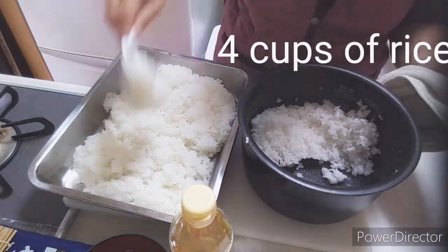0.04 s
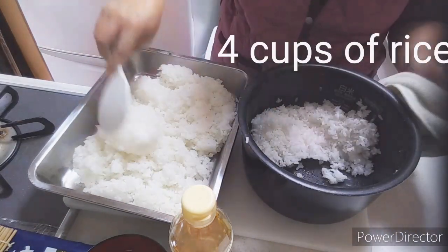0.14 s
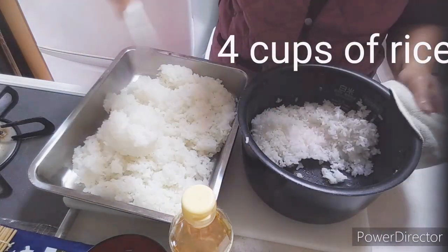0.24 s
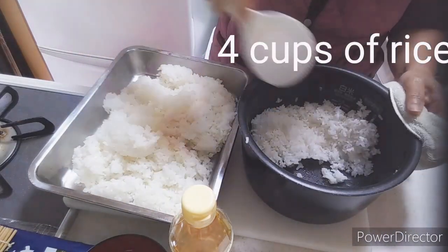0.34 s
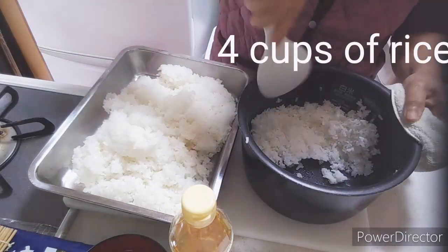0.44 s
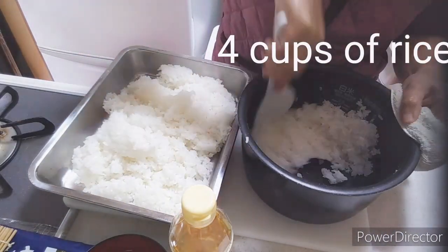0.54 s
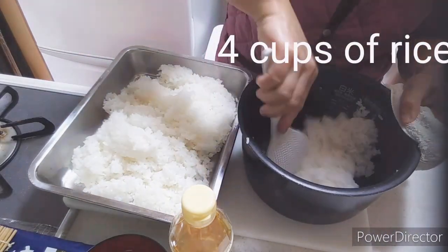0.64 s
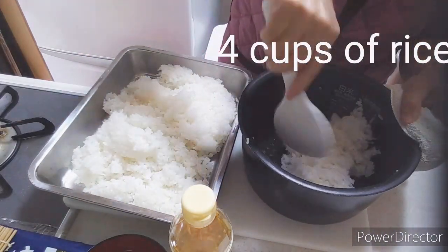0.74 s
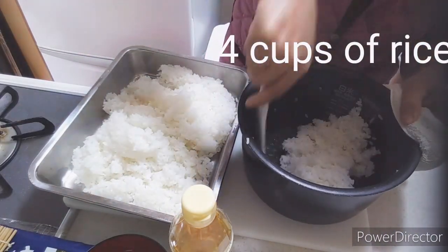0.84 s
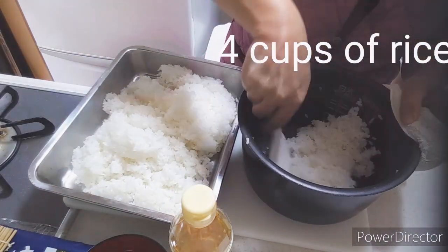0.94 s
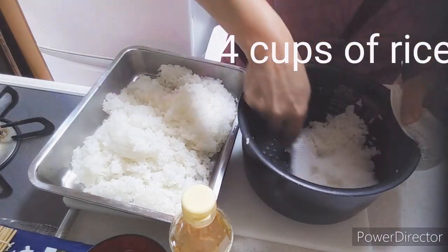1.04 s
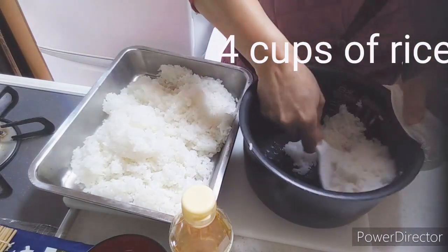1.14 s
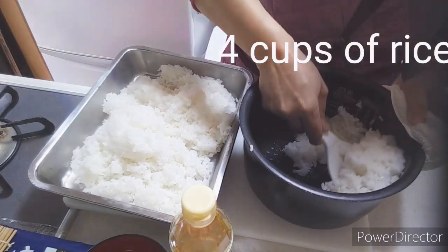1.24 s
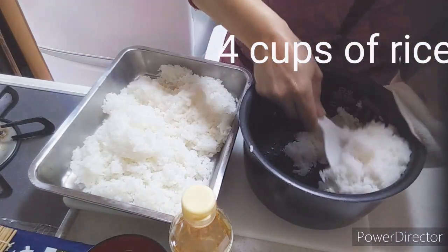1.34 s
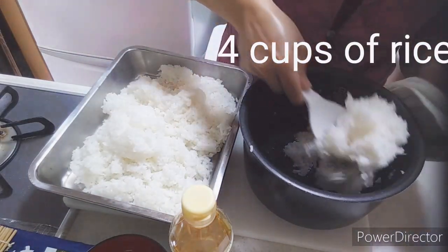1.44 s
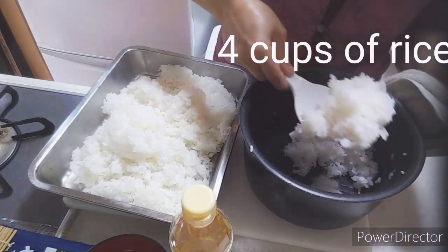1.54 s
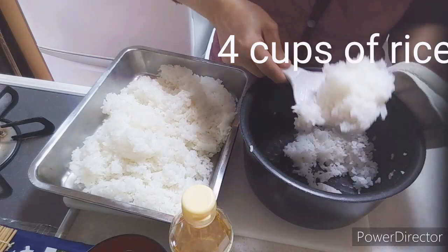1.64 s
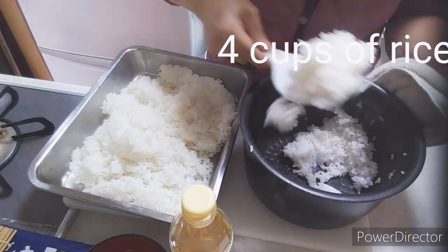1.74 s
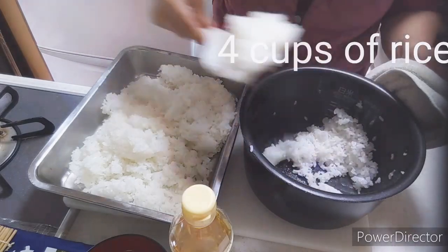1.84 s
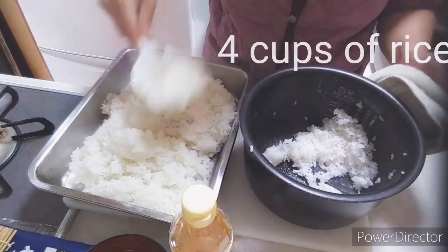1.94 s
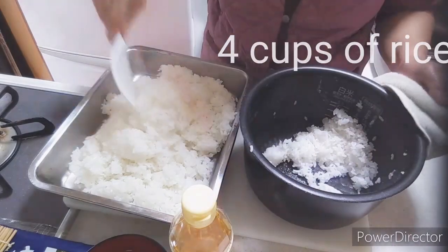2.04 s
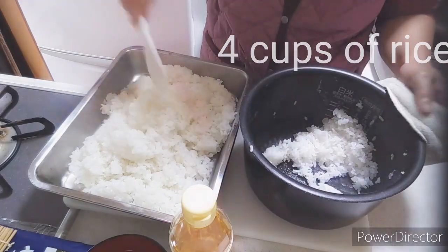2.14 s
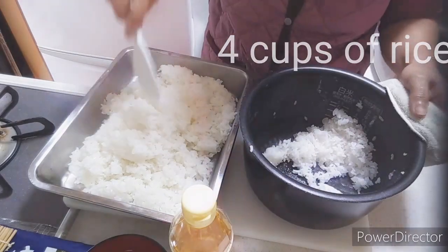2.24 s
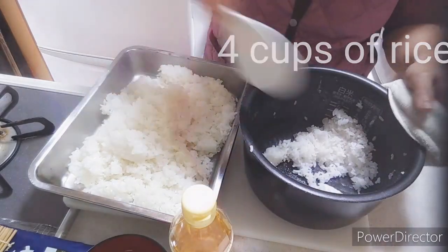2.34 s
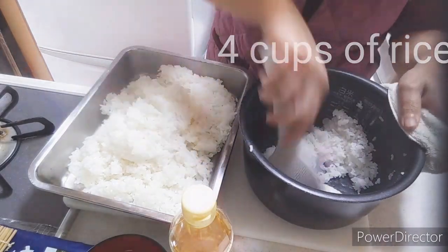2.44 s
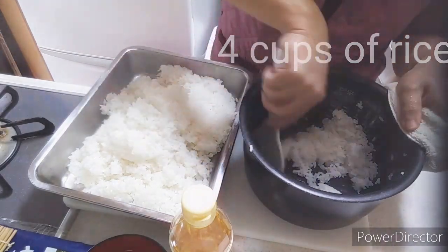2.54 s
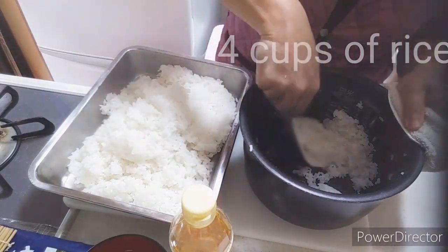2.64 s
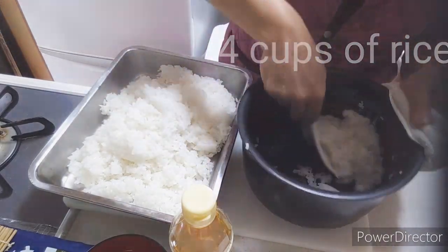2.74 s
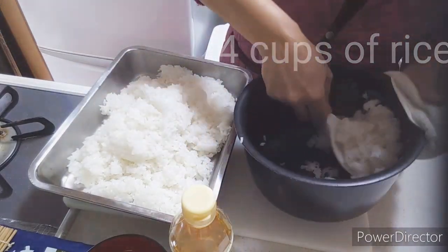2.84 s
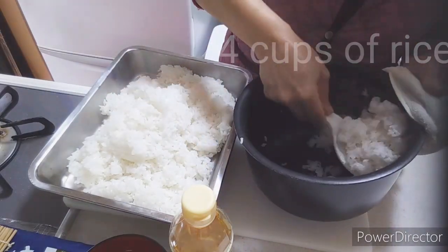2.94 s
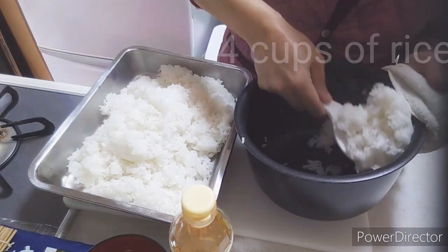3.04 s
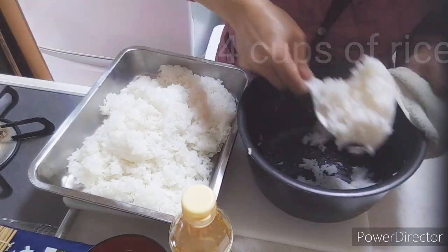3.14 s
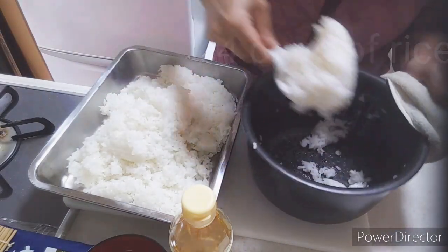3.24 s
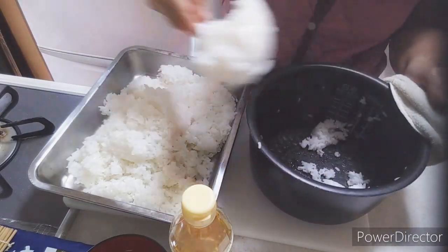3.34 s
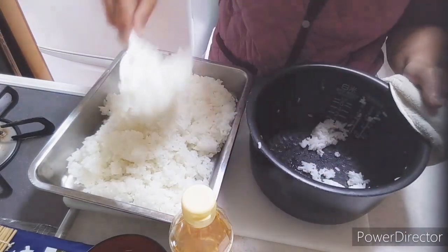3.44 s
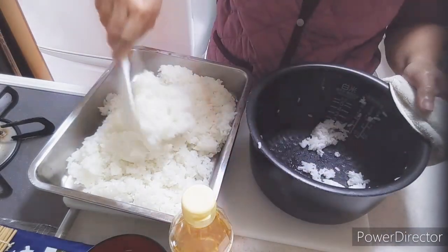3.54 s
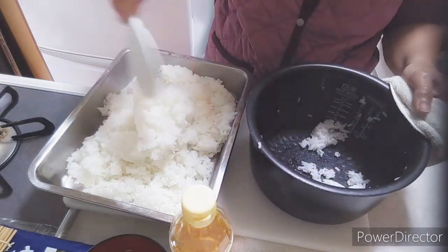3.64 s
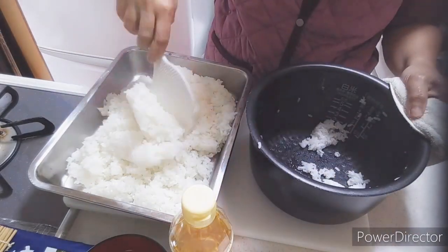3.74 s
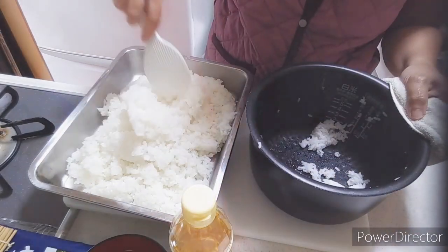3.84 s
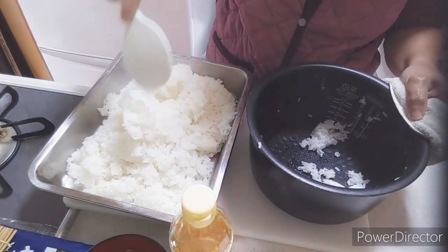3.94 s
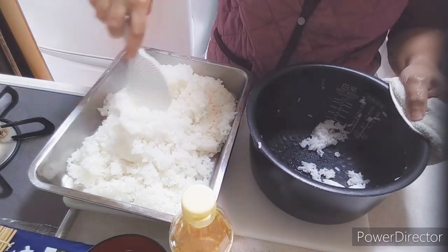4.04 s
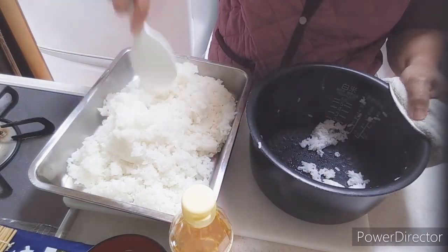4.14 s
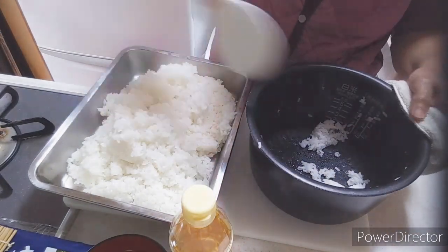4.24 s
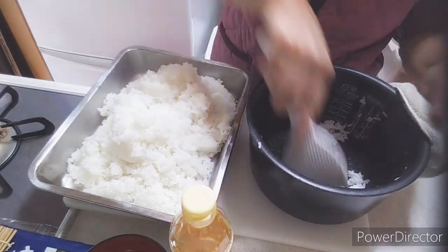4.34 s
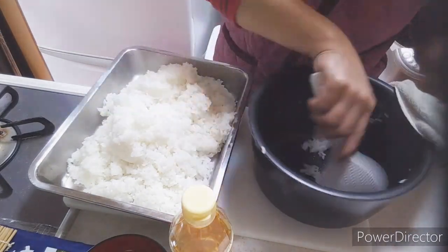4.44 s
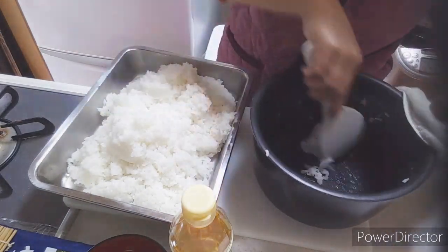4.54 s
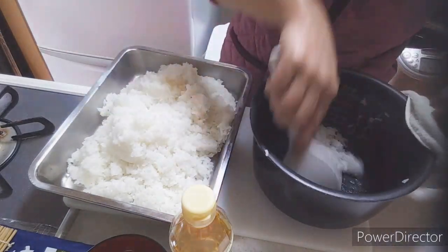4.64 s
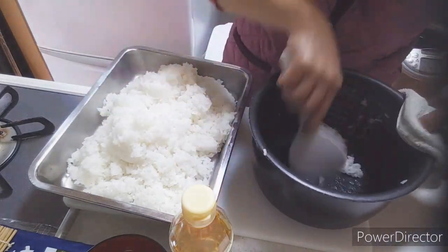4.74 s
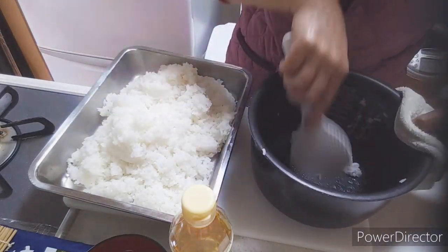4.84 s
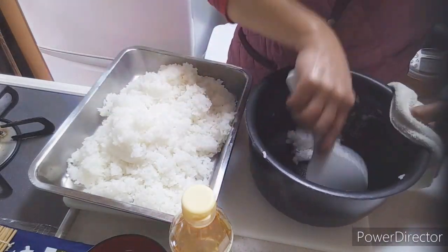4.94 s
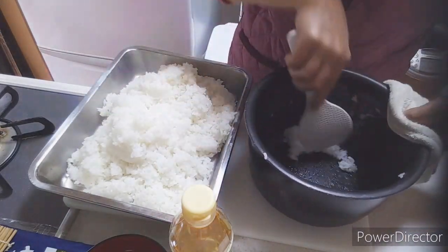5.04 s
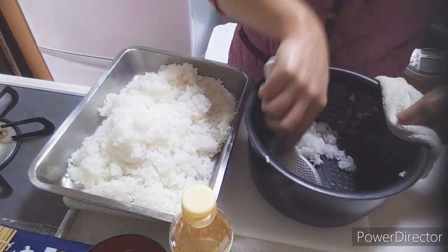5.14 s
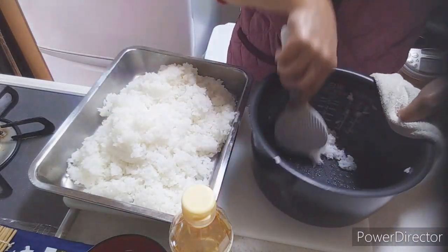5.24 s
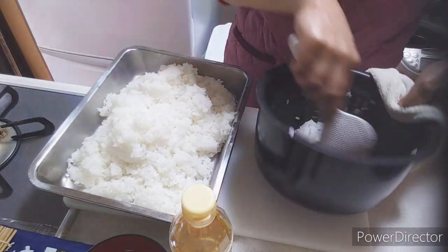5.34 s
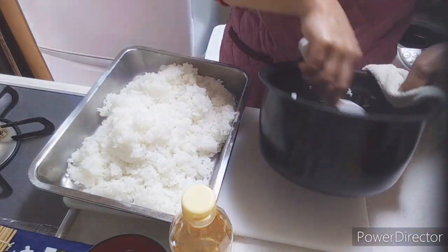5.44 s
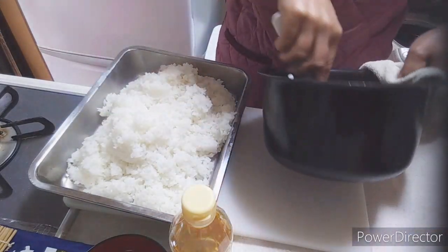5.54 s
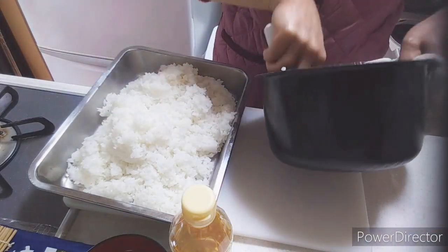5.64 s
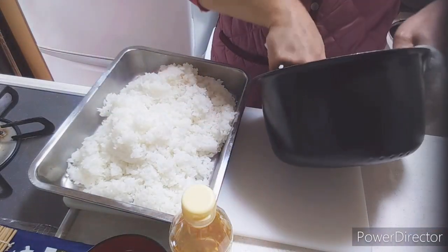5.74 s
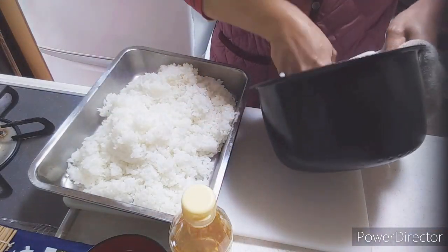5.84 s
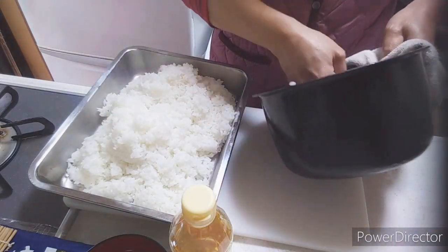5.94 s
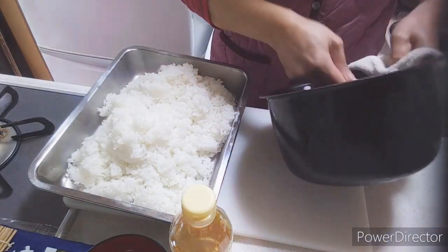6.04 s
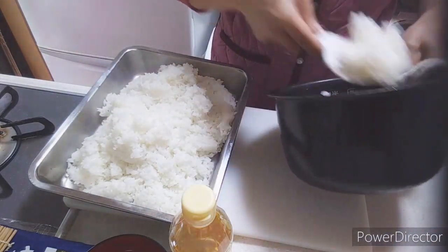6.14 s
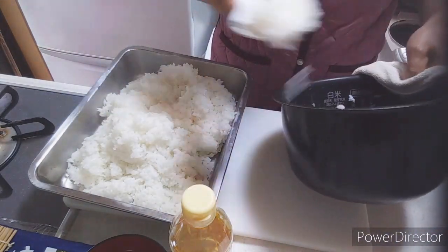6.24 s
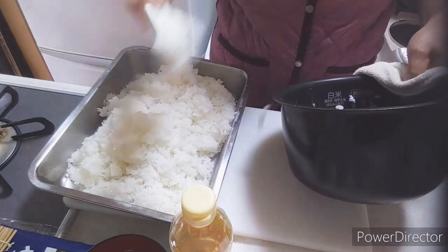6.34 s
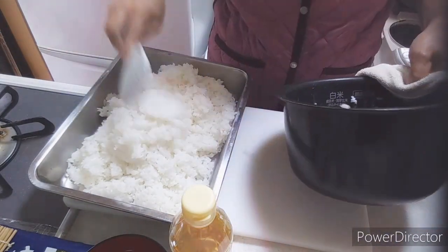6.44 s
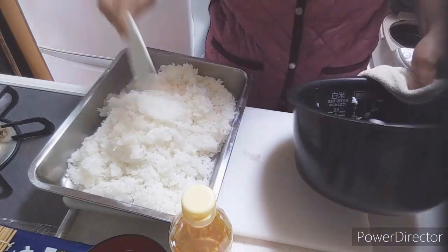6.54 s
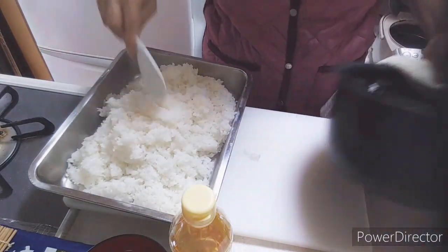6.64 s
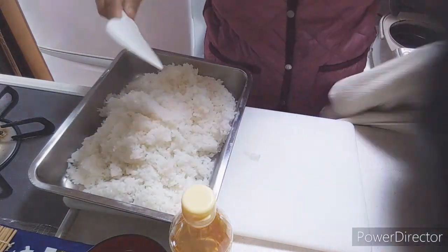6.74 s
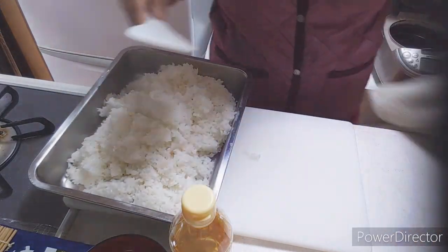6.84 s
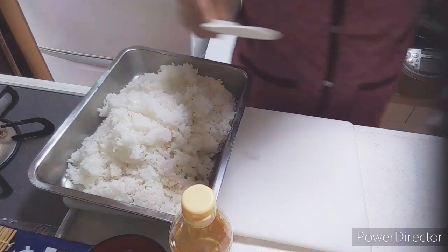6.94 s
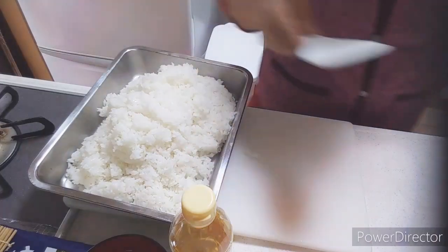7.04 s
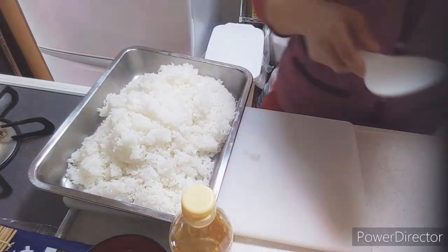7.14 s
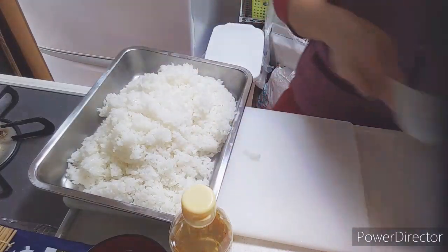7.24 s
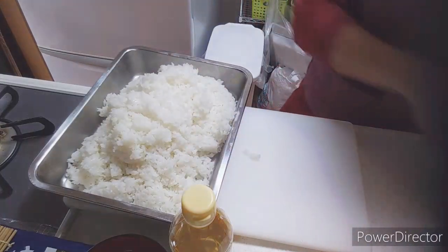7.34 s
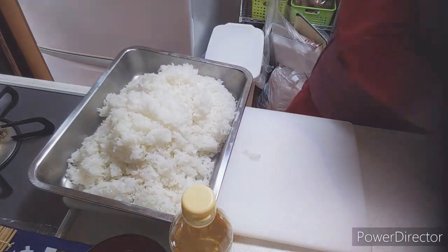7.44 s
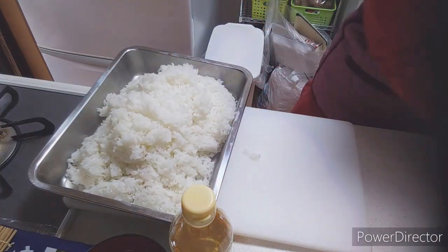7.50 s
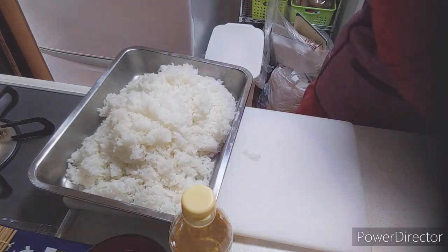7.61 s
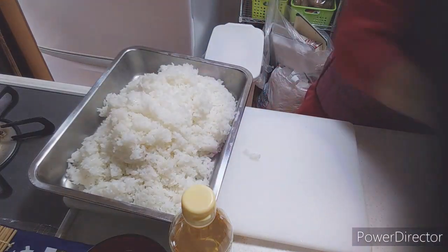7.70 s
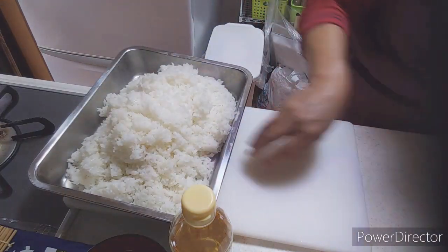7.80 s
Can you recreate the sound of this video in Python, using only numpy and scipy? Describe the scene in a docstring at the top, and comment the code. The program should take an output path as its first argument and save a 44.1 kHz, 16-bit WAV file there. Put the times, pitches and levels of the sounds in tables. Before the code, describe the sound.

A plastic paddle scrapes and knocks in a metal rice pot, squeals once loudly, then things thump down with a ringing clatter.

```python
"""Scooping rice into a tray

In a small kitchen, cooked rice is scooped from a cooker pot into a steel tray. A plastic paddle
clangs on the pot's wall, clacks and slides over its bottom, scrapes under the rice, and sticks and
slips in one loud squeal. Moist grains crackle as they part and a lump drops. At the end, things
are set down with two thumps, and the pot skids with a ringing clatter."""
import sys
import numpy as np
from scipy import signal
from scipy.fft import rfft, irfft
from scipy.io import wavfile
from scipy.ndimage import uniform_filter1d

SR = 44100
rng = np.random.default_rng(int(sys.argv[2]) if len(sys.argv) > 2 else 0)


def dump(signal):
    """Clip the signal to [-1, 1] and save it as 16-bit WAV at the path in sys.argv[1]."""
    limited = np.clip(np.atleast_2d(signal).T, -1, 1)
    pcm = np.round(limited * 32767).astype(np.int16)
    wavfile.write(sys.argv[1], SR, pcm)


N = 347059
TIME = np.arange(N) / SR
AGE = TIME[:SR // 2]  # seconds since a blow
TOP_HZ = 15550

# Borders of four bands (bass, low middle, high middle, treble): f/Hz
BAND_EDGES = [30, 500, 1400, 5500, 17000]
# How each kind of blow is shared among those bands, before hardness tilts it: level/dB
CLANG_BANDS = [-11, -4.5, 0, -1]
CLACK_BANDS = [-19, -4, 2, -11]
TAP_BANDS = [-10, -2.5, 1.5, -13.5]
THUMP_BANDS = [2, -2, -10.5, -10]
# Knocks on the pot's wall: t/s, level/dB, hardness/dB per band, ring/dB
CLANGS = [(0.607, -25, -0.5, -12), (0.658, -39.5, 1, -12), (1.016, -42, -8, -11),
          (2.626, -35.5, -0.5, -22.5), (2.699, -39.5, 1.5, -21), (4.539, -26, 6, -17),
          (5.294, -32.5, -2.5, -25), (7.767, -25, 6, -17)]
# Other blows: t/s, level/dB, hardness/dB per band
CLACKS = [(0.746, -44.5, -11), (1.063, -34, 6), (2.714, -33.5, -8.5), (2.755, -34, 0), (4.619, -34.5, -9),
          (4.853, -28.5, -4.5), (4.908, -34, 5), (5.084, -18.5, -4), (5.123, -26, 3.5), (5.156, -37, 9.5),
          (5.344, -24, 3.5), (5.366, -32.5, 1), (5.793, -31, -1.5), (5.849, -44, 2)]  # on the pot's bottom
TAPS = [(1.16, -48.5, -9.5), (1.218, -51.5, 10), (1.492, -63, 24), (1.664, -54, -0.5), (1.7, -48, 2.5),
        (1.944, -54, 6), (1.993, -54, -4), (2.297, -60, 13), (3.837, -53, 12), (4.228, -63, 19),
        (6.556, -48.5, -2), (6.726, -58.5, 2), (6.96, -51, 9), (7.674, -43.5, -8.5)]  # light taps and ticks
THUMPS = [(3.445, -39.5, -4), (3.465, -41, -6), (7.504, -20, 0.5), (7.519, -22.5, -2.5),
          (7.723, -23.5, -1.5)]  # through the worktop
# Slides of the paddle: t/s near the peak, level/dB, dying time/s, f/Hz of the hollow under the blade
SLIDES = [(0.653, -37.5, 0.0065, 910), (0.754, -38, 0.01, 1110), (2.736, -38.5, 0.032, 930),
          (4.639, -29, 0.019, 980), (4.902, -39, 0.018, 1290), (5.15, -29.5, 0.016, 1550),
          (5.366, -32, 0.019, 1700)]
# Other pushes: t/s near the peak, level/dB, dying time/s
SCRAPES = [(1.19, -53.5, .035), (1.31, -56, .045), (2.98, -52, .042), (3.17, -63, .09), (5.72, -49, .07),
           (5.88, -50.5, .035), (6.11, -56, .04)]  # paddle under rice
SQUEALS = [(5.487, -50, 0.013), (5.5485, -9.5, 0.0044), (5.559, -17.5, 0.0084), (5.575, -15, 0.0065),
           (5.596, -16, 0.012), (5.747, -35, 0.011), (7.131, -56.5, 0.011), (7.388, -54, .012)]  # paddle catching
SKIDS = [(7.772, -29.5, 0.05), (7.843, -33, 0.079)]  # pot being set down
# Hand movements that rustle grains and cloth: t/s, length/s, level/dB
RUSTLES = [(1.1, 0.29, -60.5), (1.93, .17, -67), (2.66, 0.49, -59.5), (4.31, 0.9, -64.5), (5.75, .38, -60),
           (6.39, 0.078, -60.5), (6.85, 0.13, -55), (7.42, 0.59, -51.5)]
# The blade singing faintly along the wall during the second and third scoops: t/s, relative level/dB
SINGING_CURVES = [
    [(2.8, -58), (2.818, -73), (2.9, -67), (2.932, -72), (2.96, -70), (2.98, -72), (3.06, -82)],
    [(5.73, -68), (5.75, -52), (5.8, -50.5), (5.82, -53), (5.842, -57.5), (6.074, -59), (6.18, -80)],
]
# Modes, the tones a struck thing rings with: f/Hz, level/dB, t60/s (time to fade by 60 dB)
WALL_MODES = [(147.5, -16, 0.9), (723.7, 7, 0.33), (907, -10.5, 0.59), (1965, 1, 0.52), (3454, 11.5, 0.11),
              (4930, 6.5, 0.11), (6060, -2, 0.12), (7260, -3, 0.14), (8497, -8, 0.061), (9120, 12, 0.084),
              (9738, 9, 0.064), (10660, -32, 0.14), (11400, -34, .12), (13312, 6, 0.074), (14270, -14, .18),
              (14640, 8, 0.085)]
BOTTOM_MODES = [(152, -13, .3), (285, -16, .15), (706, -3, .33), (918, 3, .14), (1238, -6, .09),
                (1575, -1, .1), (1650, -3, .11), (1800, -3, .09), (2560, -1, .08), (2740, 0, .09),
                (2934, -5, .08), (3305, -3, .09), (3650, -6, .07)]
WORKTOP_MODES = [(155.3, -11, 0.18), (220, -11, 0.3), (282.4, -4.5, 0.1), (431, -1.5, 0.046),
                 (505, -8.5, 0.089), (730, -11, 0.059), (875.4, 19, 0.041), (908, 0, 0.047),
                 (3270, 2, 0.17)]
# Resonances, the pitches the rubbed paddle favours: f/Hz, width/Hz (10 at least is used), level/dB
SQUEAL_PEAKS = [(950, 72, -4.5), (1664, 40, -3), (1770, 6.7, 9), (2020, 25.4, -1.5), (2253, 60, -19.5),
                (3160, 35.6, 1.5), (5712, 65, -2.5), (5956, 60, -28), (7400, 150, -25.5), (9070, 150, -10),
                (13540, 200, -20)]
BLADE_PEAKS = [(1865, 37, 4), (3290, 59, -0.5), (5550, 36, -2), (6800, 90, -22), (8800, 290, -10),
               (10200, 55, -17), (12100, 80, -21)]
# Colours, how strong each noise is from low to high: f/Hz, level/dB
AIR_COLOUR = [(15, -74), (25, -35), (161, -7.5), (427, -8.5), (463, -9), (503, -12.5), (863, -11.5),
              (1040, -13.5), (4870, -20.5), (14800, -24), (16000, -26.5)]
CONTACT_COLOUR = [(40, -34.5), (90, -10), (160, -3.5), (400, -5), (900, 8.5), (1800, 4.5), (3200, 0),
                  (4300, -5), (7500, -5), (10000, -5.5), (15500, -4)]
SLIDE_COLOUR = [(60, -21.5), (150, 6), (400, -5), (1000, -4.5), (2200, 0), (5000, -13.5), (15500, -10)]
RUSTLE_COLOUR = [(300, -15), (1500, 0), (4000, -2), (8000, -3.5), (12000, -2.5), (15000, -3)]
SCRAPE_COLOUR = [(35, -30), (60, -13), (222, 2.5), (785, 1.5), (903, 0.5), (1780, 1), (4640, -16.5),
                 (14900, -35), (16000, -5)]


def amp(db):
    """Turn decibels into a gain."""
    return 10 ** (np.asarray(db) / 20)


def unit(x):
    """Scale to an average strength (rms) of 1."""
    return x / np.sqrt(np.mean(x ** 2))


def fade(t60):
    """Die away by 60 dB in t60 seconds."""
    return np.exp(-np.log(1000) * AGE / t60)


def wander(size):
    """Smooth random drift that changes over about size samples."""
    return unit(uniform_filter1d(uniform_filter1d(rng.standard_normal(N), size), size))


def colour(x, points):
    """Filter a sound so that it takes on the given colour."""
    hz, db = np.transpose(points)
    size = 4096
    grid_hz = np.maximum(np.arange(size // 2 + 1) * SR / size, 1)
    gains = amp(np.interp(np.log(grid_hz), np.log(hz), db))
    cepstrum = irfft(np.log(gains))
    cepstrum[1:size // 2] *= 2  # fold it so that the filter never sounds ahead of its input
    cepstrum[size // 2 + 1:] = 0
    return signal.fftconvolve(x, irfft(np.exp(rfft(cepstrum))))[:len(x)]


def grains(per_s, spread_db):
    """Tiny slips at random moments, very uneven in size."""
    clicks = (rng.random(N) < per_s / SR) * rng.standard_normal(N)
    return unit(clicks * amp(spread_db * np.minimum(rng.exponential(size=N), 4)))


def resonate(x, peaks):
    """Let a sound ring a set of resonances, each at its own level."""
    out = 0
    for hz, width_hz, db in peaks:
        b, a = signal.iirpeak(hz, hz / max(width_hz, 10), fs=SR)
        out += amp(db) * unit(signal.lfilter(b, a, x))
    return unit(out)


def swells(rows, rise_share):
    """Loudness curve of pushes; each rises in a share of its dying time and has a rounded top."""
    power = 0
    for t, db, dying_s in rows:
        age = (TIME - t) / dying_s
        power += amp(db) ** 2 * 2 * np.exp(-np.logaddexp(-2 * age / rise_share, 2 * age))
    return np.sqrt(power)


def gap(x):
    """Echoes in the narrow gap between paddle and pot give each contact its own uneven colour."""
    echoes = rng.standard_normal(SR // 150) * fade(.009)[:SR // 150]
    echoes = .8 * echoes / np.linalg.norm(echoes)
    echoes[0] += .6  # the direct sound
    return signal.oaconvolve(x, echoes)[:len(x)]


def room(x, t60, wet_db):
    """Add the kitchen's short, blurred echo."""
    tail = rng.standard_normal(len(AGE)) * fade(t60) * (1 - np.exp(-AGE / 0.018))
    return x + amp(wet_db) * signal.fftconvolve(x, tail / np.linalg.norm(tail))[:len(x)]


def kitchen_air(level_db=-62.5):
    """The quiet, steady air of the room, with a little hiss."""
    return amp(level_db) * unit(colour(rng.standard_normal(N), AIR_COLOUR))


def strong_modes(modes):
    """One fading tone for each mode; the holding hand soon chokes what is left."""
    hz, db, t60 = np.transpose(modes)[:, :, None]
    choke = np.exp(-(AGE / .15) ** 2)
    return amp(db) * np.exp(2j * np.pi * hz * AGE) * fade(t60) * choke


def weak_modes(t60, count=110):
    """The many faint, short tones that paddle and pot have between their strong ones."""
    hz = TOP_HZ * ((np.arange(count) + 1 + rng.random(count)) / (count + 1)) ** 1.4
    gains = np.sqrt(2 * np.gradient(hz) / TOP_HZ)  # widely spaced tones get more
    age = AGE[:SR // 5]
    return gains[:, None] * np.exp(2j * np.pi * hz[:, None] * age) * fade(t60)[:len(age)]


def strike(tones, scatter_db):
    """Set the modes ringing; each spot that is hit favours different ones."""
    gains = amp(scatter_db * rng.standard_normal(len(tones)))
    phases = np.exp(2j * np.pi * rng.random(len(tones)))
    ring = ((gains * phases) @ tones).imag
    return np.pad(ring, (0, len(AGE) - tones.shape[1]))


def blows(rows, bands_db, modes, ring_db, crack_db, crack_t60, hollow_t60, tail_db, tail_t60, rise_s):
    """Each blow is a crack, a hollow clatter, a ring and the room's echo; harder ones are brighter."""
    out = np.zeros(N + SR)
    strong, weak = strong_modes(modes), weak_modes(hollow_t60)
    filters = [signal.butter(3, edges, "bandpass", fs=SR, output="sos")
               for edges in zip(BAND_EDGES, BAND_EDGES[1:])]
    crack_and_tail = amp(crack_db) * fade(crack_t60) + amp(tail_db) * fade(tail_t60)
    for (t, level_db, hardness_db), ring_gain in zip(rows, np.broadcast_to(amp(ring_db), len(rows))):
        noise = rng.standard_normal(len(AGE)) * crack_and_tail
        clatter = colour(gap(noise + strike(weak, scatter_db=3)), CONTACT_COLOUR)
        ring = ring_gain * strike(strong, scatter_db=2)
        sound = (clatter + ring) * (1 - np.exp(-AGE / rise_s))
        start = int(t * SR) + SR // 1000
        shares = amp(np.array(bands_db) + hardness_db * np.arange(len(filters)))
        for sos, share in zip(filters, shares / np.linalg.norm(shares)):
            band = signal.sosfilt(sos, sound)
            opening_rms = np.sqrt(np.mean(band[:SR // 60] ** 2))
            out[start:start + len(AGE)] += amp(level_db) * share * band / opening_rms
    return out[:N]


def clangs():
    """The paddle knocks hard on the pot's wall, which rings."""
    rows = np.array(CLANGS)
    return blows(rows[:, :-1], CLANG_BANDS, WALL_MODES, ring_db=rows[:, -1], crack_db=-12,
                 crack_t60=0.01, hollow_t60=0.065, tail_db=-13.5, tail_t60=0.43, rise_s=0.00097)


def slides(hollow_db=3, width_hz=230):
    """The blade judders over the pot's dimpled bottom and rings the hollow beneath it."""
    slips = grains(per_s=4500, spread_db=-1.5)
    rub = unit(colour(slips, SLIDE_COLOUR))
    out = 0
    for *push, hz in SLIDES:
        hollow = amp(hollow_db) * resonate(slips, [(hz, width_hz, 0)])
        out += unit(gap(rub + hollow)) * swells([push], rise_share=.75)
    return room(out, t60=.18, wet_db=-18.5)


def clacks():
    """The paddle's edge hits the pot's bottom, whose ring dies quickly."""
    return blows(CLACKS, CLACK_BANDS, BOTTOM_MODES, ring_db=-8, crack_db=6,
                 crack_t60=.014, hollow_t60=0.11, tail_db=-13.5, tail_t60=0.26, rise_s=.0002)


def rustle(attack_s=0.028, release_s=0.055):
    """Moist grains part and cloth rustles while the hands move, blurred by the pot and the room."""
    crackle = room(grains(per_s=6300, spread_db=7.5), t60=0.057, wet_db=4)
    movement = 0
    for t, length_s, db in RUSTLES:
        rise = 1 - np.exp(-np.maximum(TIME - t, 0) / attack_s)
        fall = np.exp(-np.maximum(TIME - t - length_s, 0) / release_s)
        movement += amp(db) * rise * fall
    return unit(colour(crackle, RUSTLE_COLOUR)) * movement


def taps():
    """Light, quiet taps and ticks, some dull and many crisp."""
    return blows(TAPS, TAP_BANDS, BOTTOM_MODES, ring_db=-15, crack_db=-23,
                 crack_t60=0.006, hollow_t60=0.059, tail_db=-19, tail_t60=0.4, rise_s=0.00011)


def scrapes(falter_db=2, singing_db=4):
    """The paddle is pushed unevenly under the rice and sings faintly where it meets the bare wall."""
    pressure = amp(falter_db * wander(size=600))
    slips = grains(per_s=3400, spread_db=-4)
    rubbing = unit(gap(colour(slips, SCRAPE_COLOUR))) * swells(SCRAPES, rise_share=.9)
    drag = sum(amp(singing_db + np.interp(TIME, *np.transpose(curve), left=-np.inf, right=-np.inf))
               for curve in SINGING_CURVES)
    singing = resonate(grains(per_s=4000, spread_db=-0.5), BLADE_PEAKS) * drag
    return room(pressure * (rubbing + singing), t60=0.13, wet_db=-3.5)


def thumps():
    """The worktop thuds as a lump of rice drops, and later as things are set down."""
    return blows(THUMPS, THUMP_BANDS, WORKTOP_MODES, ring_db=-6.5, crack_db=4.5,
                 crack_t60=0.065, hollow_t60=0.14, tail_db=-12, tail_t60=0.39, rise_s=0.00043)


def squeal(hz=1812, waver=0.01):
    """The paddle sticks and slips in step with one of its modes; stray slips rasp and ring others."""
    pitch_hz = hz * (1 + waver * wander(size=150))
    tone = np.sqrt(2) * np.sin(2 * np.pi * np.cumsum(pitch_hz) / SR)
    slips = grains(per_s=5000, spread_db=1.5)
    ring = amp(-13) * resonate(slips, SQUEAL_PEAKS)
    rasp = amp(-21) * unit(colour(slips, CONTACT_COLOUR))
    return room((tone + ring + rasp) * swells(SQUEALS, rise_share=.15), t60=.2, wet_db=-23)


def skid(shimmer=0.54, chatter_hz=4800):
    """The sliding pot chatters and rings its wall; long-lasting modes near the chatter grow most."""
    wall = 0
    for hz, db, t60 in WALL_MODES:
        nearness = np.exp(-(np.log(hz / chatter_hz) / .35) ** 2)
        build_up = t60 * (1 + 3 * nearness)
        flicker = 1 + shimmer * wander(size=500)
        wall += amp(db) * build_up * flicker * np.sin(2 * np.pi * (hz * TIME + rng.random()))
    grit = amp(-5) * unit(gap(colour(grains(per_s=6000, spread_db=1), CONTACT_COLOUR)))
    return (unit(wall) + grit) * swells(SKIDS, rise_share=.07)


def scene():
    """All the sounds meet at one microphone above the worktop."""
    knocks = clangs() + clacks() + taps() + thumps()
    return (knocks + slides() + skid() + squeal() + scrapes() + rustle() + kitchen_air())[None]


def record(dry, low_hz=95):
    """The microphone thins the deep bass, and the highest treble is cut."""
    thin = signal.sosfilt(signal.butter(2, low_hz, "highpass", fs=SR, output="sos"), dry)
    return signal.sosfilt(signal.ellip(10, .2, 70, TOP_HZ, fs=SR, output="sos"), thin)


dry = scene()
out = record(dry)
dump(out)
```